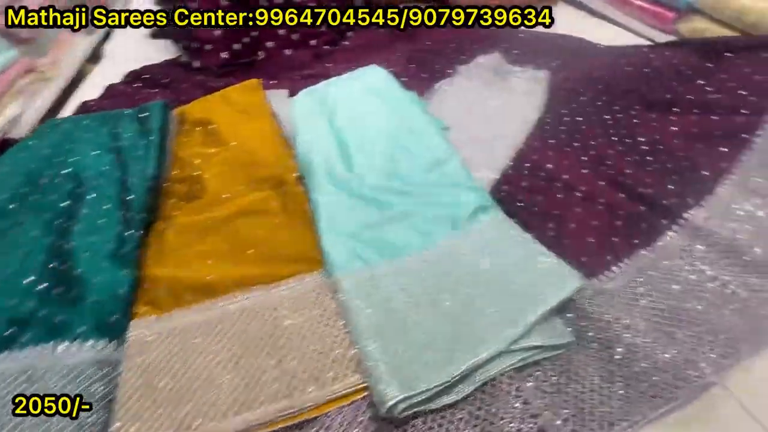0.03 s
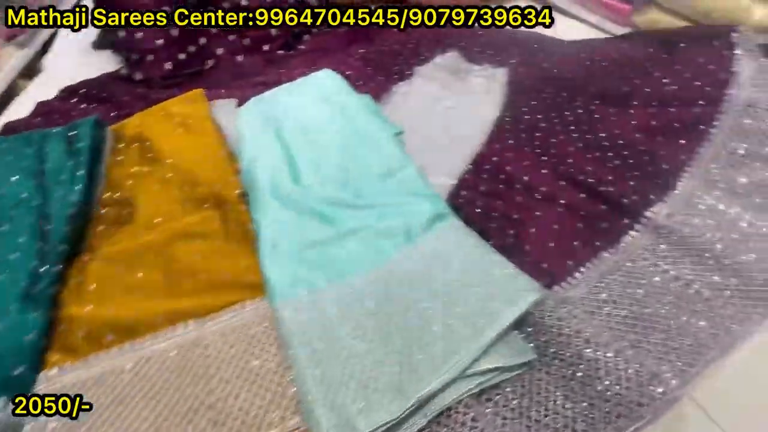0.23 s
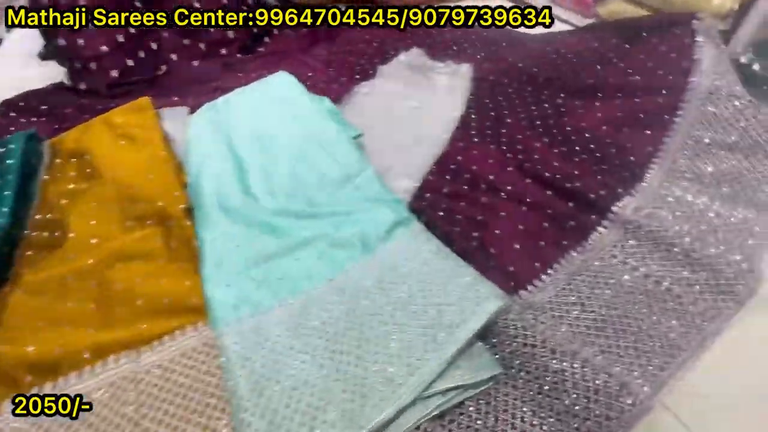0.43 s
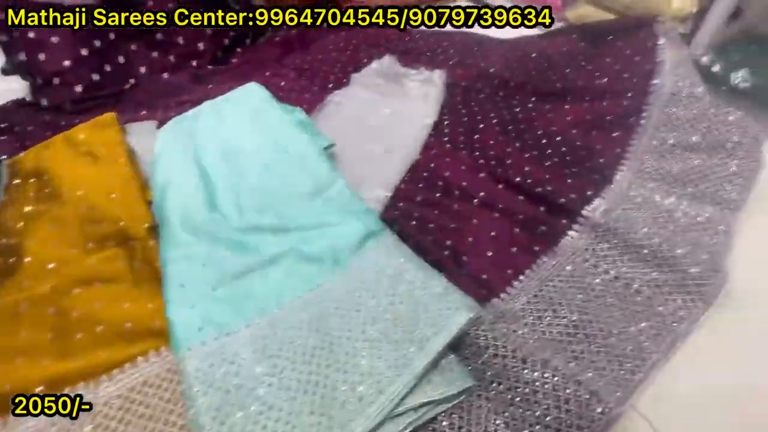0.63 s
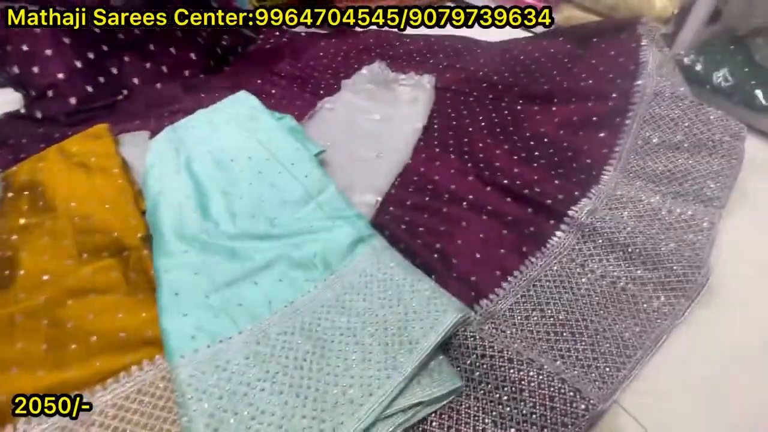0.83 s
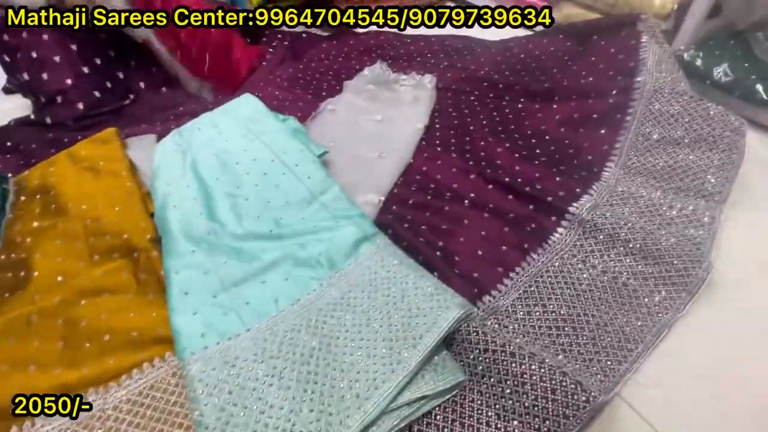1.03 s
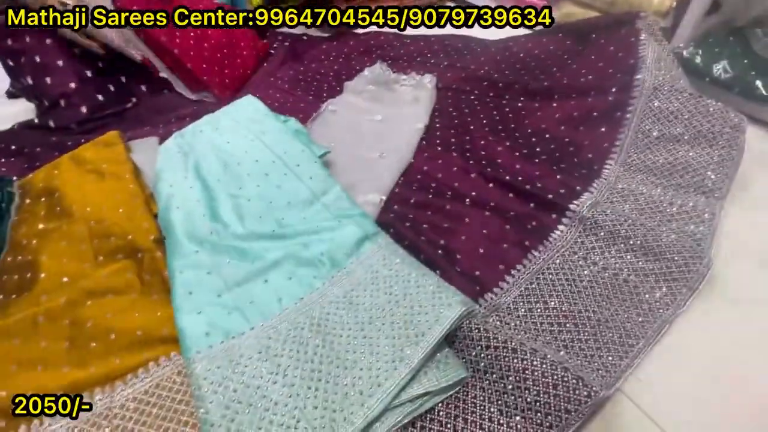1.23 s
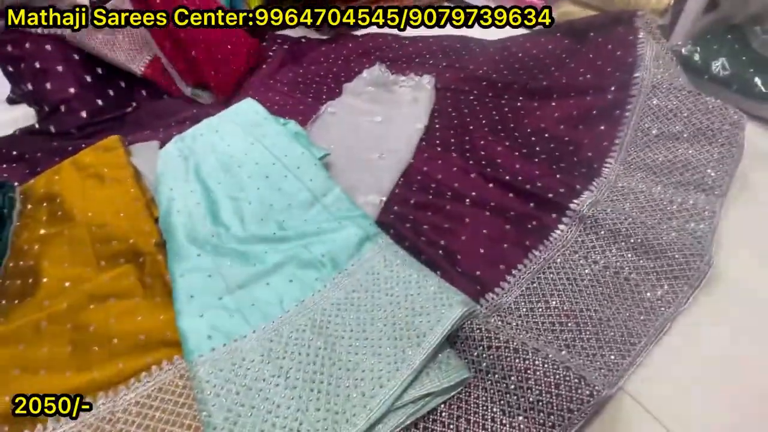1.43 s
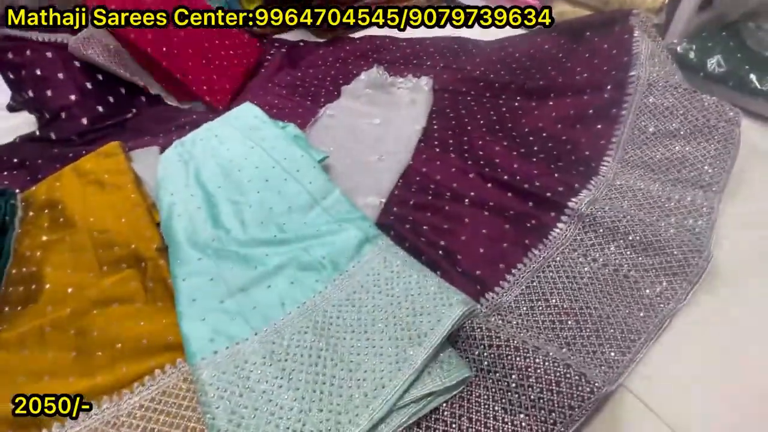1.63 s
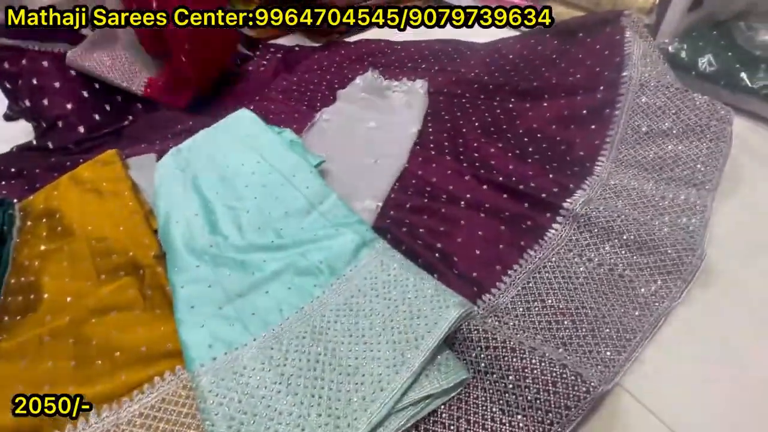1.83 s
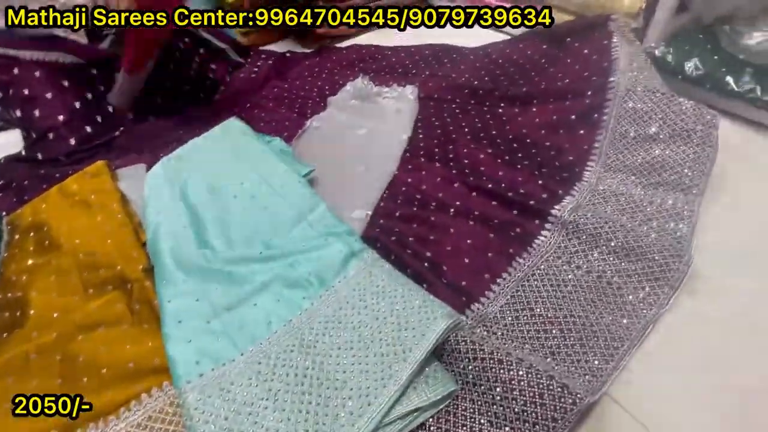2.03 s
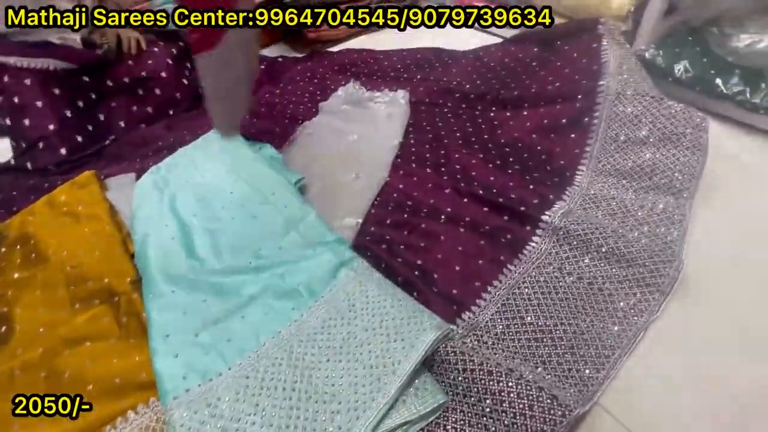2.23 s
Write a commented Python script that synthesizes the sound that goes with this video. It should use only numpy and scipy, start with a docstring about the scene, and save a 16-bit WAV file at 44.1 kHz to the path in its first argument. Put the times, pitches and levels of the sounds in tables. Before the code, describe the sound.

Stiff silky fabric rustles throughout, close and dry in a small shop. Light swishes and crisp crinkles begin at once, with a very faint high whistle until about 0.4 s. A firmer pull comes at 0.5 s, a sharp snap at 0.8, and the strongest swish with a soft dull flop near 1.1. Smaller rustles follow, then brighter crackles around 1.8-1.9 and to the end, over faint hum and swelling low rumble.

```python
"""In a small shop, stiff, silky embroidered cloth is gathered and rearranged.
Each pull drags cloth over cloth: filtered random clicks make a swish of thread slips with sharper crinkles.
Folds buckle in resonant noise bursts, and loose cloth flops in dull puffs of shaped noise.
Behind it are a low electrical hum and a swelling rumble (sines), coloured air noise and, at first,
a faint thin whistle (a wandering sine)."""
import sys
import numpy as np
from scipy import signal
from scipy.fft import rfft, irfft, next_fast_len
from scipy.io import wavfile

SR = 44100
rng = np.random.default_rng(int(sys.argv[2]) if len(sys.argv) > 2 else 0)


def inscribe(sig):
    """Save sig as 16-bit PCM at rate SR to the path in sys.argv[1].

    A 1-D sig is mono; a 2-D sig holds one channel per row.
    Samples are clipped to [-1, 1] before scaling.
    """
    pcm = np.round(np.clip(np.atleast_2d(sig).T, -1, 1) * 32767)
    wavfile.write(sys.argv[1], SR, pcm.astype(np.int16))


N = 101209
TIME = np.arange(N) / SR

# spectral density of crinkling and buckling cloth, scaled to unit power: columns (f/Hz, level per Hz/dB)
CRINKLE_SPECTRUM = [(100, -11), (600, -6), (1400, -3), (2600, -1.5), (5000, -2), (7500, -0.5), (9900, 1),
                    (11600, -12), (15500, -16.5)]


def from_db(db):
    """Decibel definition: amplitude gain is ten to the power dB / 20."""
    return 10 ** (np.asarray(db) / 20)


def rms_one(x):
    """Normalisation: scale to unit mean-square power."""
    return x / np.sqrt(np.mean(x ** 2) + 1e-20)


def colour(x, spectrum):
    """Minimum-phase filtering: the folded cepstrum makes the filter causal; white noise keeps its power."""
    size = next_fast_len(2 * N)
    hz, db = np.transpose(spectrum)
    grid = np.maximum(np.arange(size // 2 + 1) * SR / size, 1)
    gain = rms_one(from_db(np.interp(np.log(grid), np.log(hz), db)))
    cepstrum = irfft(np.log(gain), size)
    cepstrum[1:size // 2] *= 2
    cepstrum[size // 2 + 1:] = 0
    response = np.exp(rfft(cepstrum))
    return irfft(rfft(x, size) * response, size)[:N]


def resonate(x, hz, width_hz):
    """Damped resonance: a two-pole filter with about unit gain at its peak."""
    r = np.exp(-np.pi * width_hz / SR)
    numerator = np.array([1, 0, -1]) * (1 - r * r) / 2
    denominator = [1, -2 * r * np.cos(2 * np.pi * hz / SR), r * r]
    return signal.lfilter(numerator, denominator, x + 1e-18)


def drift(rate_hz):
    """Slow random modulation: white noise low-passed at rate_hz, with unit RMS."""
    low_pass = signal.butter(2, rate_hz, fs=SR, output="sos")
    slow = signal.sosfilt(low_pass, rng.standard_normal(N + SR))
    return rms_one(slow[SR:])  # the filter settles during the discarded second


def background():
    """Superposition: broadband room air, a steady sine hum and a frequency-modulated low rumble."""
    # room-air spectral density, scaled to unit power: columns (f/Hz, level per Hz/dB)
    air_spectrum = [(25, -12), (45, 8.5), (90, 8.5), (290, -7.5), (480, -4), (1300, -2.5), (4000, -12),
                    (9000, -35)]
    # rumble level before its trim: columns (t/s, level/dB)
    rumble_levels = [(0.0, -64), (0.44, -57.5), (0.53, -73), (1.03, -63), (1.57, -48.5), (1.78, -60),
                     (1.91, -50.5), (2.29, -66)]
    air_db, hum_hz, hum_db = -57, 96.9, -60
    rumble_hz, rumble_wander_hz, rumble_trim_db = 60.6, 1.74, -0.5  # wander is the RMS deviation

    air = from_db(air_db) * colour(rng.standard_normal(N), air_spectrum)
    hum = from_db(hum_db) * rms_one(np.sin(2 * np.pi * hum_hz * TIME))
    frequency = rumble_hz + rumble_wander_hz * drift(rate_hz=11.0)
    phase = 2 * np.pi * np.cumsum(frequency) / SR
    level_db = rumble_trim_db + np.interp(TIME, *np.transpose(rumble_levels))
    rumble = from_db(level_db) * rms_one(np.sin(phase))
    return air + hum + rumble


def whistle():
    """Frequency and amplitude modulation: a thin sine wanders in pitch and flickers in level."""
    # whistle level: columns (t/s, level/dB)
    whistle_levels = [(0, -56), (.07, -77), (.12, -56), (.3, -58), (.4, -83)]
    whistle_hz, wander_hz, flicker_db = 3270, 27.5, 3  # wander and flicker are RMS deviations

    frequency = whistle_hz + wander_hz * drift(rate_hz=60)
    phase = 2 * np.pi * np.cumsum(frequency) / SR
    tone = rms_one(np.sin(phase) * from_db(flicker_db * drift(rate_hz=32)))
    return from_db(np.interp(TIME, *np.transpose(whistle_levels))) * tone


def random_clicks(per_s, spread_db, size_limit):
    """Random impulse process: uneven clicks of either sign, with even power at any rate."""
    chance = np.clip(per_s / SR, 1e-5, 1)
    sizes = from_db(spread_db * np.minimum(rng.exponential(1, N), size_limit))
    signed = sizes * rng.choice([-1, 1], N)
    return signed * (rng.random(N) < chance) / np.sqrt(chance)


def grains(per_s, spread_db):
    """Impulse excitation: each thread slip clicks and briefly rings one of twelve resonances."""
    ring_q, ring_db = 11, -3.5
    clicks = random_clicks(per_s, spread_db, size_limit=3.5)
    pitches = np.geomspace(1800, 10000, 12)
    dealt = rng.integers(0, len(pitches), N)
    rings = sum(resonate(clicks * (dealt == k), hz, hz / ring_q) for k, hz in enumerate(pitches))
    return rms_one(clicks / 2 + from_db(ring_db) * rings)


def crinkles(per_s, spread_db):
    """Burst excitation: each tiny crease clicks and slips, exciting one of ten damped resonances."""
    burst_s, ring_q, ring_db, click_db = 0.00047, 2.4, 8.5, 2  # burst_s sets the decay of burst power
    clicks = random_clicks(per_s, spread_db, size_limit=3)
    pitches = np.geomspace(4200, 10000, 10)
    dealt = rng.integers(0, len(pitches), N)
    r = np.exp(-1 / (burst_s * SR))
    out = 0
    for k, hz in enumerate(pitches):
        own = clicks * (dealt == k)
        burst_power = signal.lfilter([1], [1, -2 * r, r * r], own ** 2 + 1e-18)
        burst = (1 - r) * np.sqrt(burst_power) * rng.standard_normal(N)
        force = burst + from_db(click_db) * own
        out = out + force / 2 + from_db(ring_db) * resonate(force, hz, hz / ring_q)
    return rms_one(out)


def rustle():
    """Stick-slip friction: each pull swells and fades, driving both thread slips and crinkles."""
    # pulls of the cloth, before the swish and crinkle gains:
    # columns (peak t/s, rise t/s, fall t/s, level/dB, crinkle level relative to the pull/dB)
    pulls = [(0.018, 0.015, 0.066, -46, -26), (0.149, 0.063, 0.063, -43.5, -1),
             (0.18, 0.0036, 0.0046, -35, 5.5), (0.286, 0.045, 0.054, -41.5, -5),
             (0.319, 0.00086, 0.0037, -36.5, 3), (0.469, .002, 0.038, -37, 2),
             (0.501, 0.0063, 0.046, -31.5, -2.5), (.586, 0.013, 0.042, -39.5, 0.5),
             (0.636, 0.027, 0.027, -39, -4.5), (0.68, 0.0091, .004, -43, 3),
             (.695, 0.044, 0.12, -42.5, 0.5), (.812, 0.0049, 0.0046, -37, -8), (.815, 0.029, .042, -46, -4),
             (.94, 0.056, 0.095, -46.5, -4), (1.066, 0.044, 0.011, -37.5, -5.5),
             (1.081, 0.023, 0.038, -27, 1), (1.152, 0.01, 0.049, -39.5, -2), (1.265, 0.053, .05, -39, -3),
             (1.331, 0.028, 0.091, -46, 0), (1.434, .016, .033, -39.5, -2.5),
             (1.515, 0.036, 0.029, -41.5, -16), (1.601, 0.035, 0.032, -40, -2.5),
             (1.649, 0.041, 0.037, -37, -3.5), (1.756, 0.047, 0.039, -44.5, 3.5),
             (1.812, .023, 0.068, -37.5, -.5), (1.87, 0.014, 0.048, -34.5, -2.5),
             (1.951, 0.038, 0.029, -36, 1.5), (2.002, 0.025, 0.019, -39, 0),
             (2.05, 0.027, 0.07, -40.5, 0.5), (2.139, 0.014, 0.033, -42.5, 4),
             (2.248, 0.021, .012, -47.5, 7)]
    # spectral density of the swish, scaled to unit power: columns (f/Hz, level per Hz/dB)
    swish_spectrum = [(130, -17.5), (300, -7.5), (500, -3.5), (800, -7), (1100, 0.5), (2000, -1),
                      (4000, -0.5), (7000, -1), (9700, -1), (11900, -14), (15500, -12.5)]
    creep_db, creep_crinkle_db = -57, -71  # the cloth never lies quite still
    ordinary_pull_db, rate_follows = -40, .9  # harder pulls slip and crinkle faster
    slips_per_s, slip_spread_db, swish_db = 9000, 3, -5.5  # rates are for an ordinary pull
    crinkles_per_s, crinkle_spread_db, crinkle_gain_db = 330, 1.5, -6.5
    catch_hz, catch_db = 67.6, 2  # the cloth catches and lets go as it slides

    swish_power, crinkle_power = from_db(creep_db) ** 2, from_db(creep_crinkle_db) ** 2
    for s, rise_s, fall_s, db, crinkle_db in pulls:
        pull = from_db(db) * np.exp(-((TIME - s) / np.where(TIME < s, rise_s, fall_s)) ** 2)
        swish_power = swish_power + pull ** 2
        crinkle_power = crinkle_power + (pull * from_db(crinkle_db)) ** 2
    effort = np.sqrt(swish_power)
    strength = effort / from_db(ordinary_pull_db)
    pace = strength ** rate_follows
    catching = from_db(catch_db * drift(catch_hz))
    slips = grains(slips_per_s * pace, slip_spread_db)
    swish = colour(effort * catching * slips, swish_spectrum)
    creasing = crinkles(crinkles_per_s * pace, crinkle_spread_db)
    creases = colour(np.sqrt(crinkle_power) * catching * creasing, CRINKLE_SPECTRUM)
    return from_db(swish_db) * swish + from_db(crinkle_gain_db) * creases


def snaps():
    """Buckling: a fold gives way with a click and a burst of slips, then crackles faintly as it settles."""
    # folds that buckle, before filtering and the common gain: columns (t/s, level/dB, resonance f/Hz)
    buckles = [(0.0175, -23.5, 1760), (0.1562, -15, 7300), (.28, -21, 7500), (.368, -29.5, 6050),
               (.387, -28.5, 4960), (0.478, -19.5, 5360), (0.516, -21, 7800), (.537, -33, 8700),
               (0.564, -18, 7640), (.689, -25, 6700), (0.708, -29, 7800), (.81, -12.5, 4000),
               (0.8307, -19, 6170), (.913, -26.5, 8200), (.967, -21.5, 5640), (0.9773, -27.5, 7560),
               (1.054, -12, 7350), (1.1173, -13, 8050), (1.151, -24.5, 7200), (1.1664, -28, 6400),
               (1.241, -22, 7350), (1.273, -20.5, 8200), (1.381, -23.5, 5430), (1.424, -29, 5100),
               (1.451, -22, 5400), (1.468, -22.5, 6260), (1.489, -20.5, 7000), (1.516, -20, 5250),
               (1.56, -26.5, 4500), (1.61, -26, 7540), (1.625, -22.5, 9000), (1.72, -21.5, 7600),
               (1.7289, -30, 7500), (1.792, -12.5, 6160), (1.863, -10, 7040), (1.946, -23, 6900),
               (2.0315, -19.5, 8050), (2.1205, -22, 7600), (2.127, -19, 6700), (2.138, -19, 7950),
               (2.1453, -27, 7600), (2.207, -32, 6500), (2.2455, -22, 8300), (2.2711, -15, 8400)]
    burst_s, burst_db = 0.00062, -8
    settle_s, crackle_db = 0.0032, -19
    ring_q, ring_db, snap_db = 1.7, -0.5, 1.5

    out = np.zeros(N + SR)
    t = TIME[:SR // 20]
    shape = from_db(burst_db) * np.exp(-t / burst_s) + from_db(crackle_db) * np.exp(-t / settle_s)
    for s, db, hz in buckles:
        force = shape * rng.standard_normal(len(t)) * np.sqrt(rng.exponential(1, len(t)))
        force[0] = 1  # the opening click
        force = force / np.linalg.norm(force)
        ring = 2 * from_db(ring_db) * resonate(force, hz, hz / ring_q)
        start = int(s * SR)
        out[start:start + len(t)] += from_db(db) * (force / 2 + ring)
    # a small fold radiates little bass
    out = signal.sosfilt(signal.butter(2, 1200, "high", fs=SR, output="sos"), out)
    return from_db(snap_db) * colour(out, CRINKLE_SPECTRUM)


def flops():
    """Air displacement: loose, falling cloth pushes air in soft, dull puffs of noise."""
    # puffs: columns (peak t/s, level/dB)
    puffs = [(.185, -60), (.29, -61), (1.082, -46), (1.9, -61)]
    # spectral density of the puffs, scaled to unit power: columns (f/Hz, level per Hz/dB)
    puff_spectrum = [(60, -22), (160, -1), (290, -7.5), (520, -2), (800, -5.5), (2000, -63)]
    puff_s = 0.041  # from the peak to 1/e of its amplitude
    push = sum(from_db(db) * np.exp(-((TIME - s) / puff_s) ** 2) for s, db in puffs)
    return colour(push * rng.standard_normal(N), puff_spectrum)


def shop(x):
    """Diffuse reverberation: convolution with decaying noise, short as in a room lined with cloth."""
    t60_s = 0.13
    t = TIME[:SR // 2]
    decay = from_db(-60 * t / t60_s) * (t > .003)  # reflections begin after 3 ms
    tail = rng.standard_normal(len(t)) * decay
    return signal.fftconvolve(x, tail / np.linalg.norm(tail))[:N]


def scene():
    """Linear superposition: resonance-coloured cloth and its reverberation over the background."""
    # resonances that colour all the cloth: columns (f/Hz, bandwidth/Hz, level/dB)
    presence = [(1547, 51, -0.5), (2590, 420, -7), (4870, 160, -12.5)]
    room_db = -16
    cloth = rustle() + snaps() + flops()
    cloth = cloth + sum(from_db(db) * resonate(cloth, hz, width_hz) for hz, width_hz, db in presence)
    return (cloth + from_db(room_db) * shop(cloth) + background() + whistle())[None]


def record(dry):
    """Band limitation: a high-pass cuts the deepest bass and an elliptic low-pass the top."""
    bass_cut_hz, top_cut_hz = 38, 15800
    dry = signal.sosfilt(signal.butter(4, bass_cut_hz, "high", fs=SR, output="sos"), dry)
    return signal.sosfilt(signal.ellip(12, .1, 70, top_cut_hz, fs=SR, output="sos"), dry)


dry = scene()
out = record(dry)
inscribe(out)
```